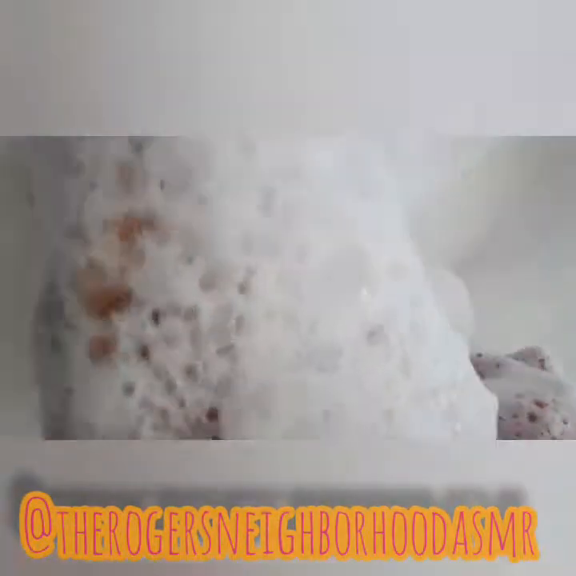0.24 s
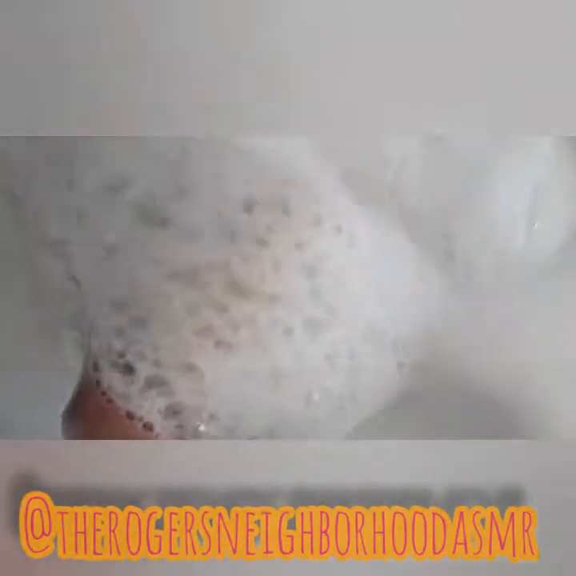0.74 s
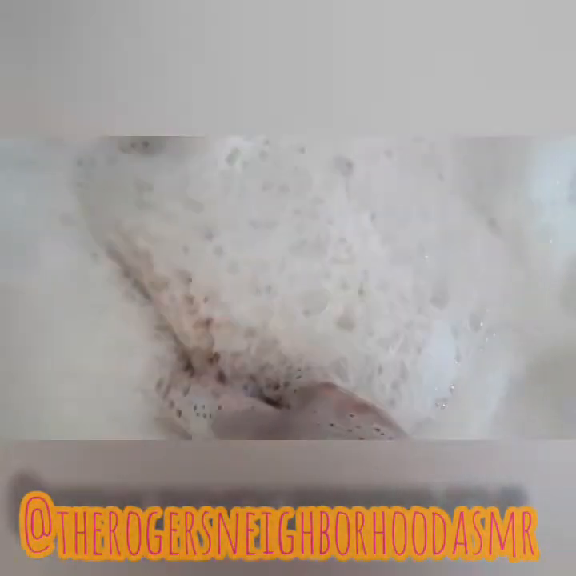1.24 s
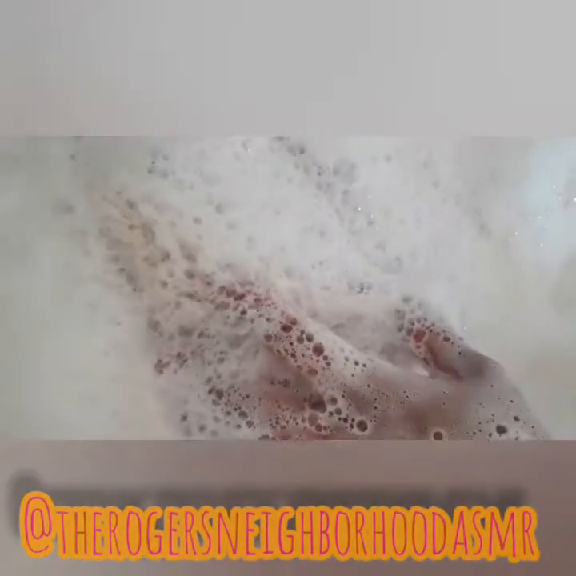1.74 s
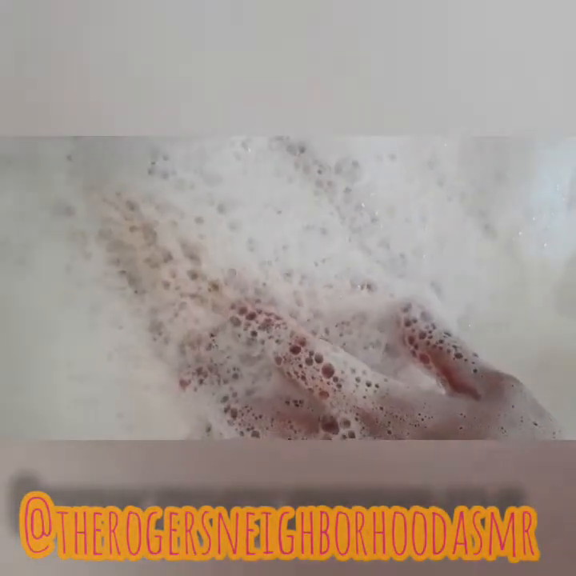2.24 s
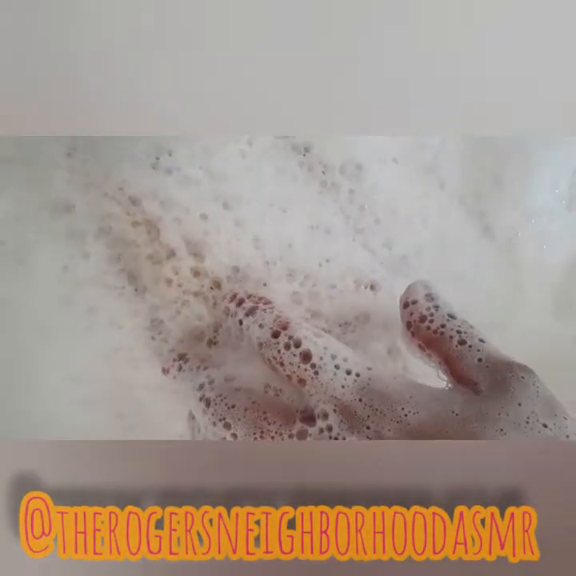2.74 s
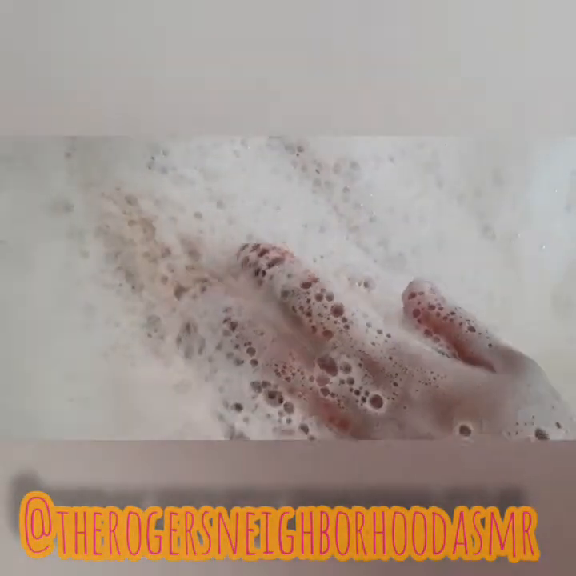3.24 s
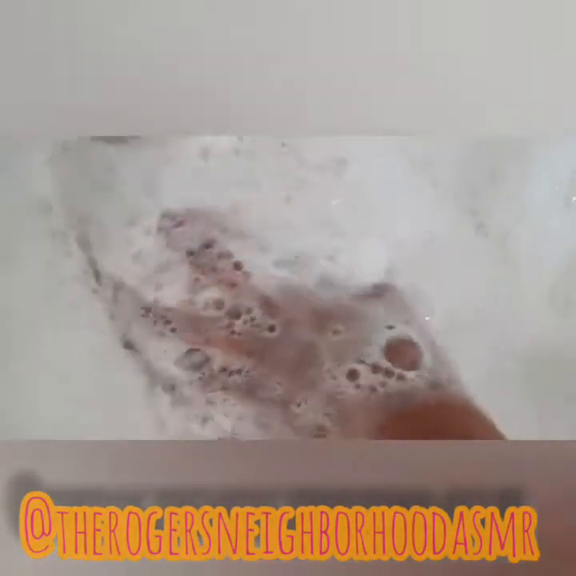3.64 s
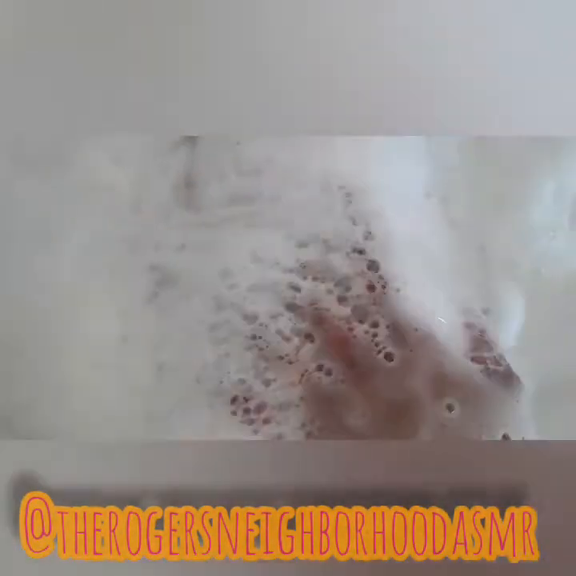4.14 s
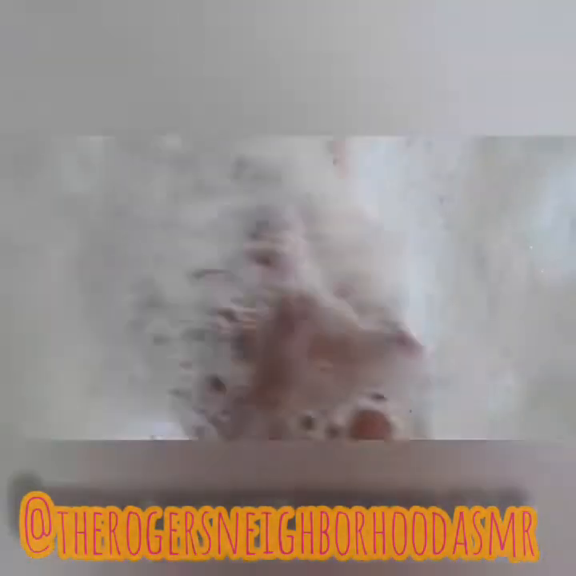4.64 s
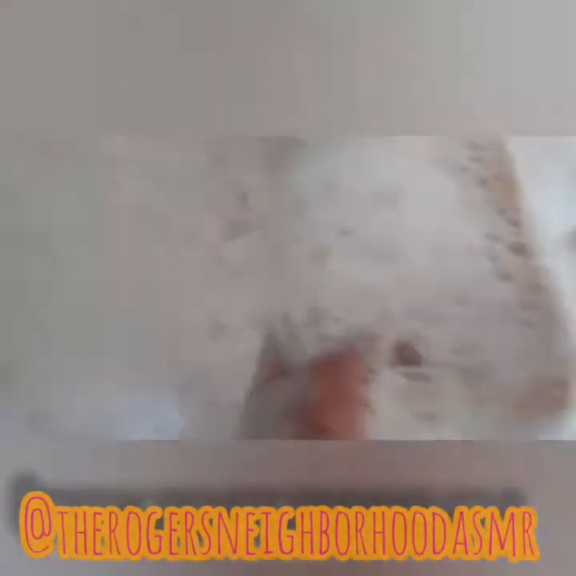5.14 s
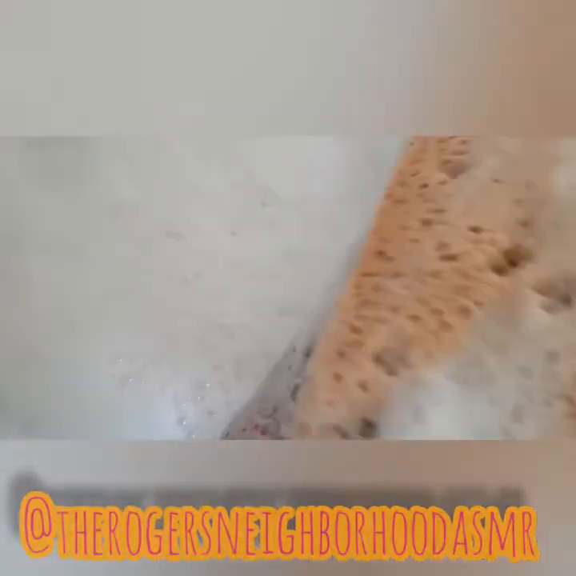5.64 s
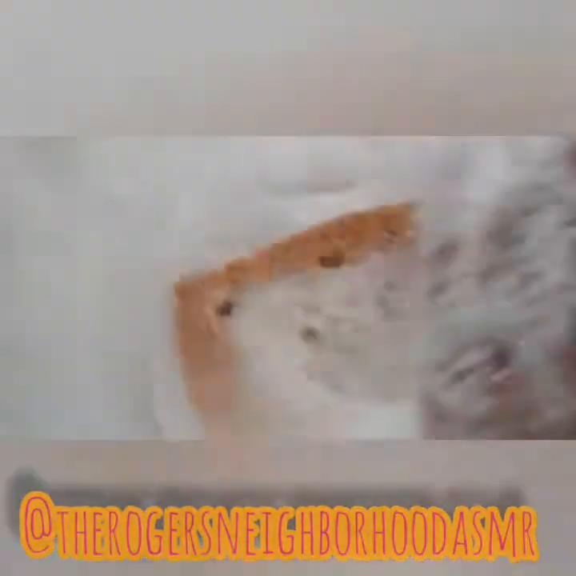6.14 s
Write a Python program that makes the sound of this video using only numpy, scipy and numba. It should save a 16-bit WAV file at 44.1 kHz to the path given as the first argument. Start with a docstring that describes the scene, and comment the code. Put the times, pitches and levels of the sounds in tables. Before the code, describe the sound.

Close wet squelches and loud hollow glugs from a foamy sponge, separated by quiet fizzing suds in a small hard-walled room.

```python
"""Glugs, wet spurts, sloshing and tearing, fizzing foam: a hand kneads a soaked sponge in a tub of suds.
The microphone is close, in a small hard room; tub walls echo, the room rings on, a faint rumble lies under all.
Glugs are damped tones; spurts, churn and foam are coloured showers of bursting films; slosh is such a
shower through a moving resonance. The loudest glug overloads the microphone."""
import sys
import numpy as np
from scipy import signal
from scipy.fft import rfft, irfft, next_fast_len
from scipy.io import wavfile
from numba import njit

SR = 44100
rng = np.random.default_rng(int(sys.argv[2]) if len(sys.argv) > 2 else 0)


def wav_out(sig):
    """Save sig, one row per channel (or a flat mono array), as 16-bit PCM at SR to the path in sys.argv[1]."""
    wavfile.write(sys.argv[1], SR, np.round(np.clip(np.atleast_2d(sig).T, -1, 1) * 32767).astype(np.int16))


N = 280917
TIME = np.arange(N) / SR


def undb(db):
    """Decibels to gain."""
    return 10 ** (np.asarray(db) / 20)


def unit(x):
    """Scale to rms 1."""
    return x / np.sqrt(np.mean(x ** 2))


def ring_down(t, t60):
    """Exponential decay that loses 60 dB in t60 seconds."""
    return np.exp(-np.log(1000) * t / t60)


def read(points, hz):
    """Read (Hz, value) points on a log-frequency axis."""
    point_hz, value = np.transpose(points)
    return np.interp(np.log(np.maximum(hz, 1)), np.log(point_hz), value)


def colour(x, points):
    """Causal minimum-phase filter with the given spectrum, so that pops keep their sharp fronts."""
    size = next_fast_len(2 * len(x))
    gain = undb(read(points, np.arange(size // 2 + 1) * SR / size))
    # folding the cepstrum onto positive times makes the filter causal
    cepstrum = irfft(np.log(gain), size)
    cepstrum[1:size // 2] *= 2
    cepstrum[size // 2 + 1:] = 0
    response = np.exp(rfft(cepstrum))
    return irfft(rfft(x, size) * response, size)[:len(x)]


def add(out, start_s, x):
    """Mix x into out from start_s."""
    start = max(int(start_s * SR), 0)
    out[start:start + len(x)] += x[:len(out) - start]


def walk(rate):
    """Smooth random drift with a spread near 1, through rate new random points a second."""
    return np.interp(TIME * rate, np.arange(N), rng.standard_normal(N))


def pops(rate, spread_db, size=N):
    """Bursting films: rate randomly timed impulses a second, of random sign and size."""
    chance, strength, sign = rng.random((3, size))
    sizes = undb(spread_db * np.minimum(-np.log(1 - strength), 2 * np.pi))
    bursts = (chance < rate / SR) * np.sign(sign - .5) * sizes
    return unit(bursts + 1e-9)  # never all zero


@njit
def cavity(x, hz, damping):
    """Band-pass resonance whose centre moves: a state-variable filter."""
    y, band, low = np.empty(len(x)), 0., 0.
    for i in range(len(x)):
        g = np.tan(np.pi * hz[i] / SR)
        v = (band + g * (x[i] - low)) / (1 + g * (g + damping))
        band, low, y[i] = 2 * v - band, low + 2 * g * v, v
    return y


# Spectrum of the faint rumble in the room: hz, relative_level_db
RUMBLE_COLOUR = [(25, 2), (45, -1), (60, -2), (82, 8.5), (120, 0), (170, 3), (300, -18), (600, -11),
                 (1200, -21), (3000, -31.5), (15000, -29)]


def room_rumble():
    """Steady random noise, strongest in the bass, under everything."""
    return unit(colour(rng.standard_normal(N), RUMBLE_COLOUR)) * undb(-65.5)


# The hand's slow grip on the sponge, before each layer's trim:
# time_s, squeezed_foam_db, moved_water_db, standing_suds_fizz_db
GRIP = [(0.0, -50, -52, -58), (0.4, -58.5, -60, -54.5), (0.95, -57, -55.5, -52.5), (1.12, -70, -62, -60),
        (1.361, -68, -61.5, -54.5), (1.58, -77.5, -82, -58), (2.02, -68, -70, -56.5),
        (2.3, -37.5, -41, -53), (2.68, -34.5, -46.5, -42), (2.88, -42, -49.5, -49),
        (3.17, -49.5, -59.5, -58.5), (3.82, -55, -54, -50), (4.4, -62, -59, -57.5), (4.85, -71, -70, -63),
        (4.98, -69.5, -73, -55), (5.18, -73.5, -77, -60.5), (5.3, -52, -56.5, -55.5),
        (6.37, -62.5, -55.5, -56)]
# Presses of the fingers, before each layer's trim:
# start_s, rise_s, relaxing_t60_s, foam_db, water_db, low_churn_db, slosh_resonance_hz
PRESSES = [(0.0, 0.0043, .2, -44, -40.5, -45, 696), (0.24, .015, .4, -58.5, -53.5, -47.5, 742),
           (0.48, 0.027, .35, -86, -47.5, -50.5, 762), (1.16, 0.018, .5, -75, -55, -57, 770),
           (1.38, .025, 0.18, -78, -46.5, -48.5, 984), (2.04, .02, .42, -29.5, -30, -33, 1190),
           (2.239, 0.022, .38, -30.5, -23, -37, 684), (2.498, .05, .25, -38, -44.5, -60, 1250),
           (2.664, 0.026, .28, -32.5, -31, -36.5, 800), (2.78, 0.028, .25, -44, -39.5, -56, 739),
           (2.991, 0.041, .25, -47, -44, -70, 950), (3.48, 0.011, .35, -46.5, -43, -52, 1006),
           (3.698, 0.02, .35, -37, -36.5, -45.5, 1130), (3.88, 0.0078, .4, -69, -49, -48.5, 798),
           (4.749, 0.031, .3, -80, -59, -67, 900), (5.230, .009, 0.33, -45.5, -45, -48, 932),
           (5.36, 0.068, .35, -42.5, -52, -52, 1000), (5.72, 0.03, .2, -47.5, -55, -47.5, 834),
           (5.78, 0.037, .3, -42.5, -49, -55, 1042), (6.075, 0.024, 0.25, -52, -50.5, -61, 963),
           (6.144, 0.0097, .2, -62, -57, -52, 765), (6.25, 0.013, .2, -52, -49.5, -52.5, 650)]
PRESS_HOLD_SHARE = 0.77  # a press swells, holds for this share of its rise, then relaxes
GRIP_CHURN_DB = -4.5  # low churn under the slow grip, against the moving water
RESTING_HOLLOW_HZ = 820
# slow presses raise more fizz: level against the foam at a reference rise, and growth per doubling of it
FIZZ_SHARE_DB, FIZZ_RISE_S, FIZZ_DB_PER_DOUBLING = -6, 0.047, 6.5


def hand():
    """Press powers add to the grip: gives foam, water, churn and fizz levels (dB) and the hollow's pitch (Hz)."""
    times, *columns = np.transpose(GRIP)
    foam, water, fizz = (undb(np.interp(TIME, times, levels)) ** 2 for levels in columns)
    powers = np.array([foam, water, water * undb(GRIP_CHURN_DB) ** 2, fizz])
    weighted_pitch = water * RESTING_HOLLOW_HZ
    for start_s, rise_s, t60, foam_db, water_db, churn_db, hz in PRESSES:
        swell = np.clip((TIME - start_s) / rise_s, 0, 1)
        relaxing = np.maximum(TIME - start_s - rise_s * (1 + PRESS_HOLD_SHARE), 0)
        press_power = (swell * ring_down(np.minimum(relaxing / t60, 2), 1)) ** 2
        fizz_db = foam_db + FIZZ_SHARE_DB + FIZZ_DB_PER_DOUBLING * np.log2(rise_s / FIZZ_RISE_S)
        levels = undb([foam_db, water_db, churn_db, fizz_db]) ** 2
        powers = powers + np.outer(levels, press_power)
        weighted_pitch = weighted_pitch + press_power * undb(water_db) ** 2 * hz
    # the hollow's pitch is an average weighted by the power of the moving water
    return 10 * np.log10(powers), weighted_pitch / powers[1]


# Spectrum of water churning under the sponge: hz, relative_level_db
CHURN_COLOUR = [(40, -27), (62, -19.5), (85, -7.5), (120, -2.5), (200, -4.5), (320, -6), (600, -4),
                (1500, -43)]


def churning(churn_db):
    """Low churn of water under the sponge, as a shower of coloured pops."""
    return unit(colour(pops(rate=630, spread_db=0.5), CHURN_COLOUR)) * undb(churn_db - 1.5)


def sloshing(slosh_db, slosh_hz, fits):
    """Water pops ring twice through the hollow of the hand, whose pitch wavers."""
    hollow_hz = np.clip(slosh_hz * 2 ** (0.36 * walk(rate=49)), 100, 5000)
    splashes = pops(rate=1900, spread_db=1.5)
    slosh = cavity(cavity(splashes, hollow_hz, 0.48), hollow_hz, .9)
    return unit(slosh) * undb(slosh_db - 2.0 + 0.62 * fits)


def bubbles(hz, rate, cycles, spread_db):
    """Small bubbles of many sizes, each a brief tone that rises as it reaches the surface."""
    out, t = np.zeros(N), TIME[:SR // 20]
    for when, size, strength, life in rng.random((int(rate * N / SR), 4)):
        pitch = hz * 2 ** (2 * size - 1)
        age = t * pitch / (cycles * (.5 + life))
        tone = np.sin(2 * np.pi * pitch * t * (1 + .07 * np.minimum(age, 1)))
        onset = 1 - np.exp(-t * pitch)
        add(out, when * N / SR, undb(spread_db * strength) * tone * ring_down(age, 1) * onset)
    return unit(out)


# Spectrum of tearing foam: hz, relative_level_db
TEAR_COLOUR = [(400, -6), (1000, -4.5), (1700, -0.5), (2600, -0.5), (3400, 0), (5000, 0), (7000, -5.5),
               (10000, -7.5), (15500, -39.5)]


def tearing(tear_db, fits):
    """Foam films tear in fits, through a moving gap resonance, with bubbles among them."""
    films = colour(pops(rate=4500, spread_db=1.0), TEAR_COLOUR)
    # gaps between the fingers open and close, so the tearing foam keeps changing colour
    gap_hz = np.clip(3300 * 2 ** (.5 * walk(rate=55)), 1200, 9000)
    tear = undb(-5.0) * unit(films)
    tear = tear + undb(-13.5) * unit(cavity(films, gap_hz, 0.17))
    tear = tear + undb(-14.5) * bubbles(hz=3033, rate=120, cycles=18, spread_db=22.5)
    return tear * undb(tear_db + 2.2 * fits)


# Spectrum of fizzing suds: hz, relative_level_db
FIZZ_COLOUR = [(1500, -13), (4000, -14.5), (5300, -8.5), (6400, -8), (7600, -4), (9400, 3), (10400, -6),
               (11800, -4.5), (13300, -10.5), (15500, -13)]


def fizzing(fizz_db, fits):
    """Fine suds fizz, as a dense shower of treble pops."""
    fizz = unit(colour(pops(rate=3500, spread_db=3.0), FIZZ_COLOUR))
    return fizz * undb(fizz_db - 1.5 + 1.0 * fits)


def kneading():
    """The hand drives churn, slosh, tearing foam and fizz; all but the churn share the same random fits."""
    (tear_db, slosh_db, churn_db, fizz_db), slosh_hz = hand()
    fits = walk(rate=70)
    water = churning(churn_db) + sloshing(slosh_db, slosh_hz, fits)
    return water + tearing(tear_db, fits) + fizzing(fizz_db, fits)


# Air pockets that break free and ring: start_s, starting_pitch_hz, level_db, t60_s
GLUGS = [(0.001, 198, -17.5, 0.036), (0.119, 424, 3, 0.013), (0.120, 203, -9, 0.039),
         (0.364, 345, -20.5, 0.042), (0.367, 212, -17, 0.019), (1.02, 199, -39, 0.085),
         (2.075, 142, -27.5, 0.061), (2.239, 427, -1.5, 0.022), (2.242, 523, -10.5, 0.032),
         (2.271, 499, -10.5, 0.06), (4.0908, 610.5, 10.5, 0.027), (4.100, 183, -25, 0.094),
         (4.105, 802, -6, 0.045), (4.118, 515, -1.5, 0.037), (4.159, 520, -9.5, 0.061),
         (4.367, 590, -10, 0.016), (4.383, 508, -8.5, 0.015), (5.724, 910, -27, 0.025)]
GLUG_BEND_OCTAVES = -0.15  # pitch change over the ring


def glugs():
    """Each air pocket rings as a damped tone that bends as its opening changes."""
    out, t = np.zeros(N), TIME[:SR // 5]
    for start_s, hz, level_db, t60 in GLUGS:
        pitch = hz * 2 ** (GLUG_BEND_OCTAVES * np.minimum(t / t60, 1))
        phase = 2 * np.pi * np.cumsum(pitch) / SR
        opening = 1 - np.exp(-(t / .0015) ** 2)
        add(out, start_s, undb(level_db) * opening * ring_down(t, t60) * np.sin(phase))
    return out


# The room's diffuse ring: spectrum as hz, level_db; dying away as hz, t60_s
ROOM_TONE = [(60, -13.5), (130, 3), (300, 2), (600, -3.5), (1500, -4), (5000, -3), (10000, -4.5),
             (15000, -8)]
ROOM_T60 = [(100, 0.6), (300, 0.37), (700, 0.57), (2000, 0.39), (5000, 0.3), (14000, 0.23)]


def diffuse_tail():
    """One path through the room: noise that builds up quickly, each band dying at its own rate."""
    t, hz = TIME[:SR], np.arange(SR // 2 + 1)
    centres = 62.5 * 2 ** np.arange(9)  # octave bands, Hz
    noise, tail = rfft(rng.standard_normal(SR)), 0
    for centre, share in zip(centres, np.eye(len(centres))):
        band = irfft(noise * read(np.column_stack([centres, share]), hz), SR)
        tail = tail + band * ring_down(t, read(ROOM_T60, centre))
    build_up = np.minimum(t / 0.012, 1) ** 2
    return colour(unit(tail * build_up) / np.sqrt(SR), ROOM_TONE)


# Echoes off the nearby walls, before each source's echo_db: delay_s, level_db
ECHOES = [(0.0131, -3.5), (0.0291, -11.5), (0.071, -26.5)]
# Standing waves of the room, before each source's tail_db: pitch_hz, gain_at_resonance_db, t60_s
ROOM_MODES = [(115.8, 11.5, 0.19), (161.7, 12.5, 0.7), (208.7, 5.5, 0.23), (243, 5, .7), (370, -1, .6),
              (558, -11, 0.99), (627.5, -1.5, 0.7), (593, 0, 0.79), (640, -10, 0.67), (754, 6, 0.76),
              (810, 1, 0.2)]


def room(x, echo_db, tail_db, count=3):
    """Direct sound, a few wall echoes, standing waves and a diffuse tail."""
    t, response = TIME[:SR], np.zeros(SR)
    for mode_hz, gain_db, t60 in ROOM_MODES:
        decay = np.log(1000) / t60
        strength = undb(gain_db + tail_db) * 2 * decay / SR
        response += strength * np.exp(-decay * t) * np.cos(2 * np.pi * mode_hz * t)
    for delay_s, level_db in ECHOES:
        add(response, delay_s, undb([level_db + echo_db]))
    # sounds spring from ever-changing spots on the sponge, each with its own path through the room
    spots = np.array([walk(rate=35) for _ in range(count)])
    spots = spots / np.sqrt(np.sum(spots ** 2, axis=0))
    tail = sum(signal.oaconvolve(x * spot, diffuse_tail())[:N] for spot in spots)
    return x + signal.oaconvolve(x, response)[:N] + undb(tail_db) * tail


# Air and suds forced through the sponge, before muffling:
# start_s, level_db, rise_s, t60_s, centre_hz, width_octaves
SPURTS = [(0.119, -27.5, 0.0012, 0.032, 1025, 0.22), (1.30, -59.5, 0.016, .23, 2680, 0.14),
          (1.762, -40, 0.0061, .22, 5600, .9), (2.041, -32, .008, 0.51, 2060, 3.7),
          (2.056, -28, .002, 0.025, 3360, 2.8), (2.239, -16, 0.0052, 0.22, 580, 1.34),
          (2.239, -25, 0.0027, .09, 3980, 1.5), (2.254, -13, 0.0022, 0.043, 2600, 1),
          (2.436, -32.5, 0.0012, 0.057, 3440, 3.1), (2.570, -34, 0.0026, 0.026, 3770, 1.5),
          (2.622, -23, 0.002, 0.056, 4430, 2.1), (2.666, -25, .0007, 0.076, 7100, 1.4),
          (2.832, -28, 0.0045, .038, 3100, 1), (2.994, -34.5, 0.01, .06, 3800, 2.6),
          (3.056, -37.5, 0.00069, .055, 2620, 2), (3.168, -33.5, 0.01, .035, 6900, 0.38),
          (3.168, -40, .01, 0.055, 1440, .7), (3.251, -38, .012, 0.097, 3100, .22),
          (3.259, -35, 0.0056, 0.1, 6000, .87), (3.346, -36.5, 0.01, .13, 1740, .24),
          (3.350, -32, 0.011, .052, 3860, 1.55), (3.703, -34.5, .011, 0.12, 1190, .5),
          (3.712, -31.5, 0.0037, .051, 3176, 1.2), (4.089, -20.5, 0.0026, .02, 2200, 1.1),
          (4.098, -17, 0.0069, 0.12, 628, .25), (4.103, -29.5, 0.0058, 0.13, 1410, .3),
          (4.104, -33, 0.0029, .18, 3176, 0.45), (5.724, -32.5, 0.0018, .018, 600, 1.5),
          (5.812, -47.5, 0.013, 0.31, 5000, .32), (6.073, -47, 0.018, .15, 5000, 1.1)]
# Suds muffle the top of the spurts: hz, gain_db
MUFFLE = [(7000, -1), (9500, 1.5), (11500, -1.5), (15500, -7)]


def spurts():
    """Each spurt is a short dense rush of bursting films, coloured by the gap it escapes through."""
    out, t = np.zeros(N), TIME[:SR // 3]
    octaves = np.linspace(-6, 6, 25)
    for start_s, level_db, rise_s, t60, hz, width in SPURTS:
        gap_db = -18 * np.log10(1 + (octaves / width) ** 2)
        gap_db = gap_db - 2.0 * np.maximum(octaves, 0) ** 2  # steeper above the centre
        gap_colour = np.column_stack([hz * 2 ** octaves, gap_db])
        rush = unit(colour(pops(rate=9000, spread_db=-2.0, size=len(t)), gap_colour))
        swell = np.minimum(t / rise_s, 1) ** 2.5
        add(out, start_s, undb(level_db) * rush * swell * ring_down(np.maximum(t - rise_s, 0), t60))
    return colour(out, MUFFLE)


def scene():
    """Glugs low in the tub echo most, spurts ring the room most, and a faint rumble lies under all."""
    rumble = room_rumble()
    wet = room(glugs(), echo_db=0.0, tail_db=-5.5)
    wet = wet + room(spurts(), echo_db=-11.5, tail_db=1.0)
    wet = wet + room(kneading(), echo_db=-14.5, tail_db=-7)
    return (wet + rumble)[None]


LOW_CUT_HZ, TOP_HZ = 60, 15750


def record(dry):
    """The microphone loses the deep bass and clips at full scale; the top is cut off."""
    low_cut = signal.butter(2, LOW_CUT_HZ, "high", fs=SR, output="sos")
    thin = signal.sosfilt(low_cut, dry)
    clipped = thin / (1 + np.abs(thin) ** 16) ** (1 / 16)
    top_cut = signal.ellip(10, .1, 80, TOP_HZ, fs=SR, output="sos")
    return signal.sosfilt(top_cut, clipped)


dry = scene()
out = record(dry)
wav_out(out)
```